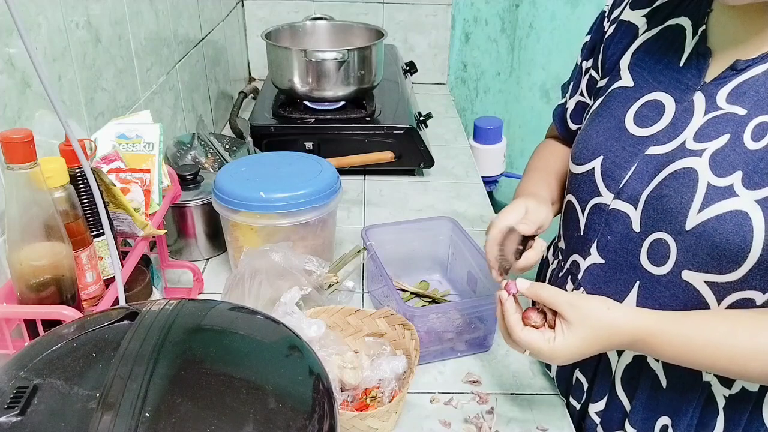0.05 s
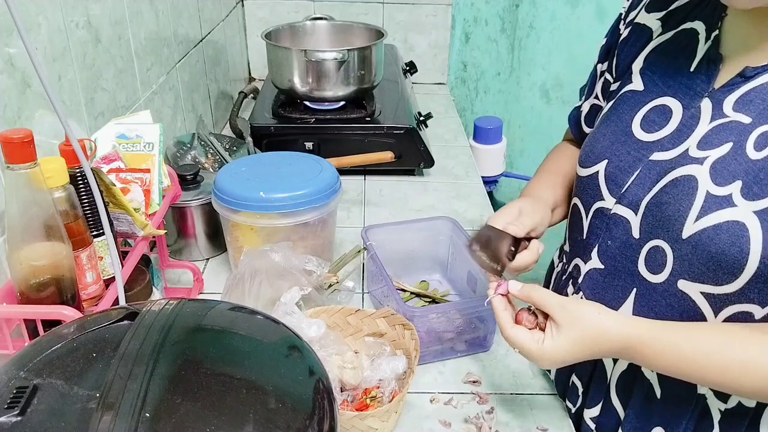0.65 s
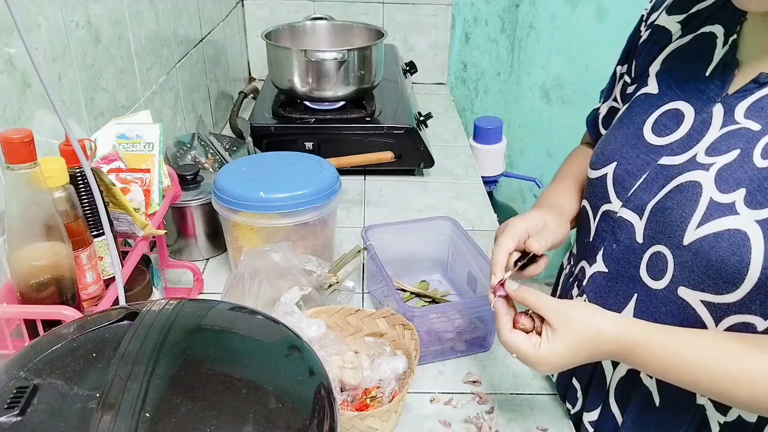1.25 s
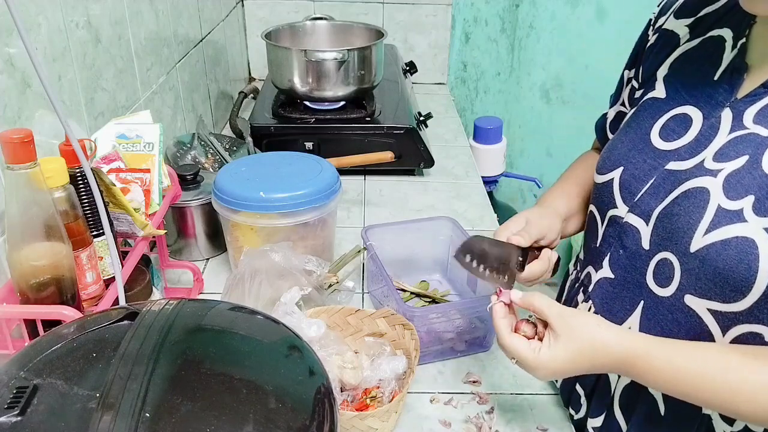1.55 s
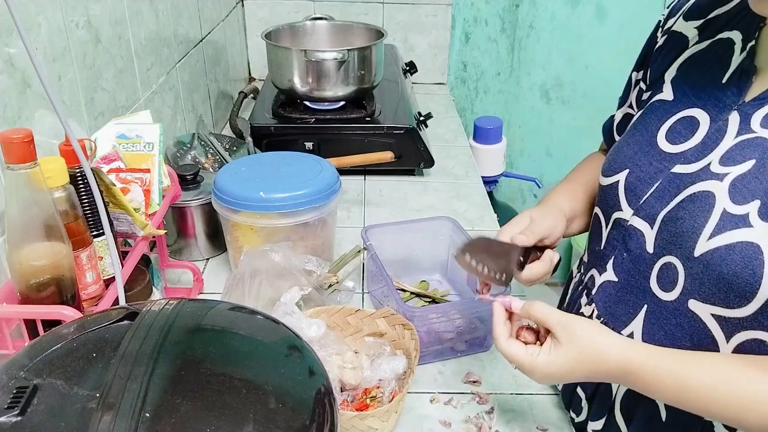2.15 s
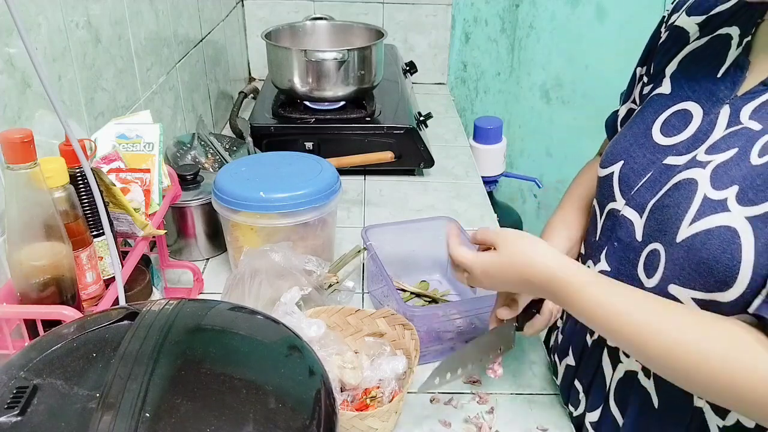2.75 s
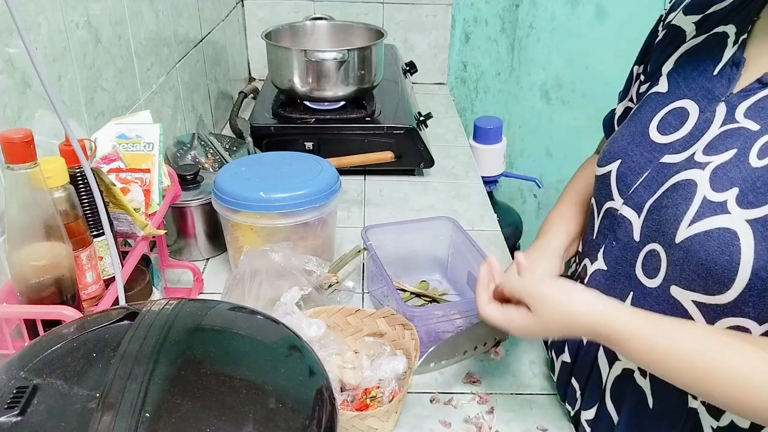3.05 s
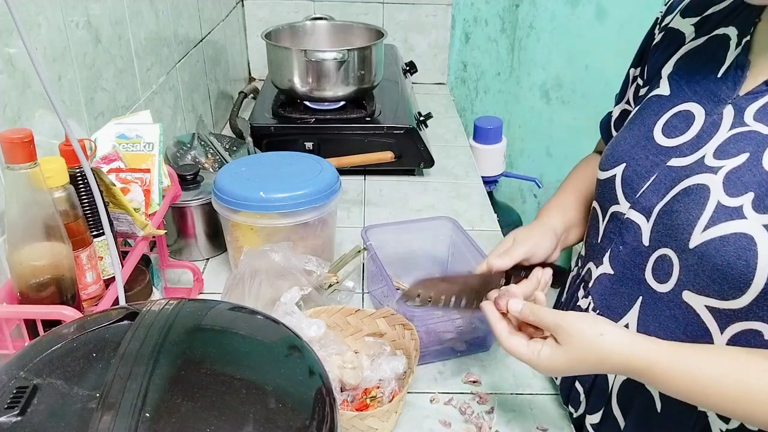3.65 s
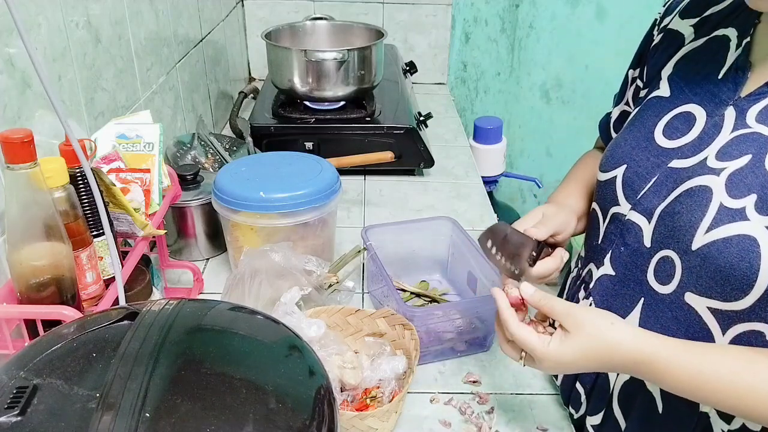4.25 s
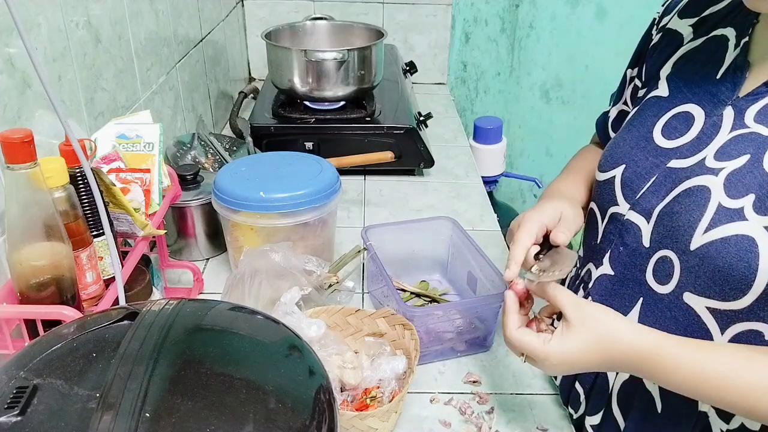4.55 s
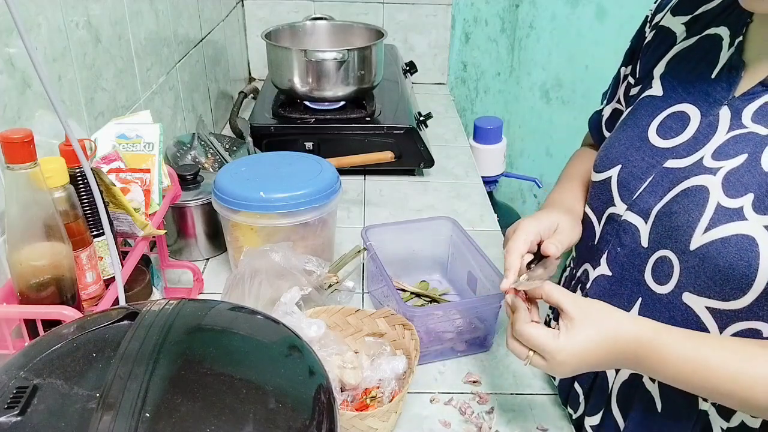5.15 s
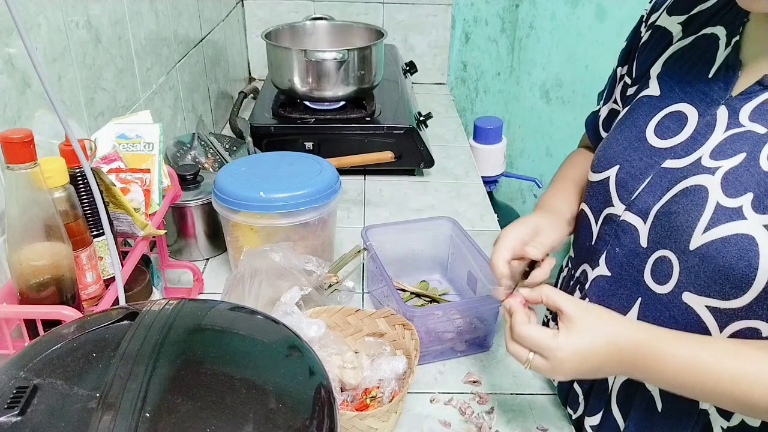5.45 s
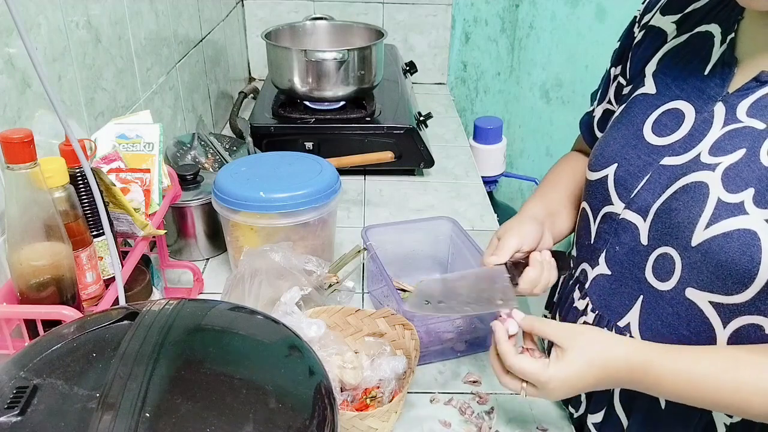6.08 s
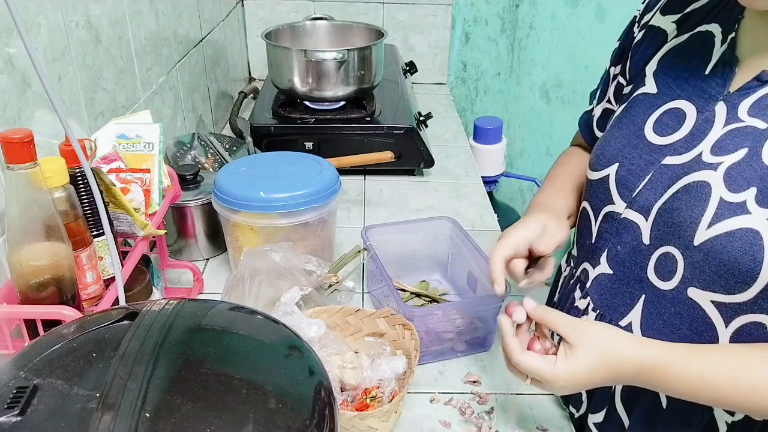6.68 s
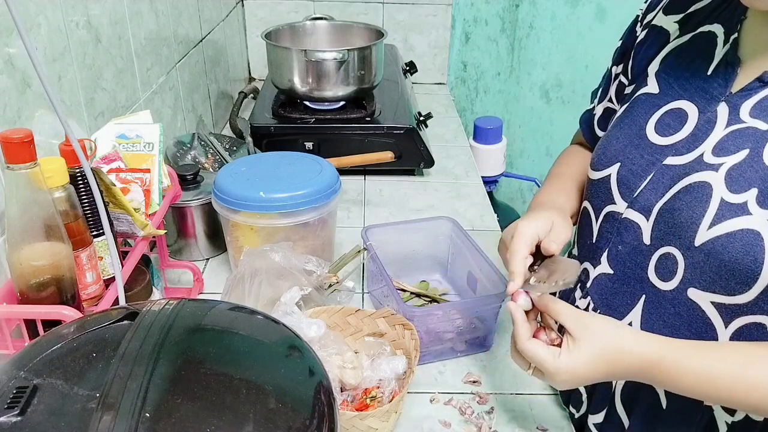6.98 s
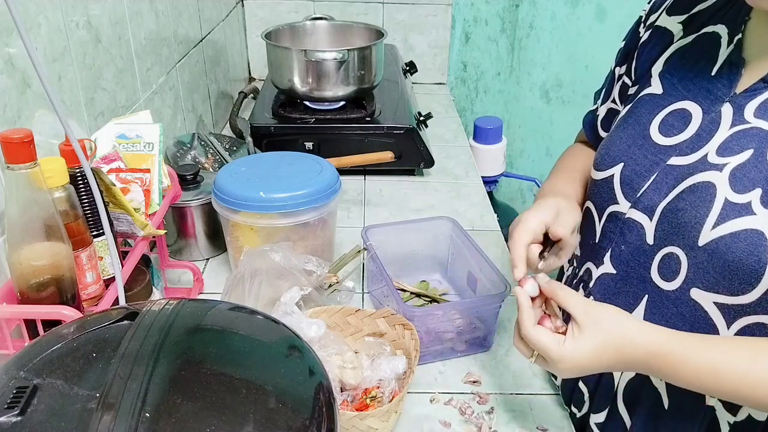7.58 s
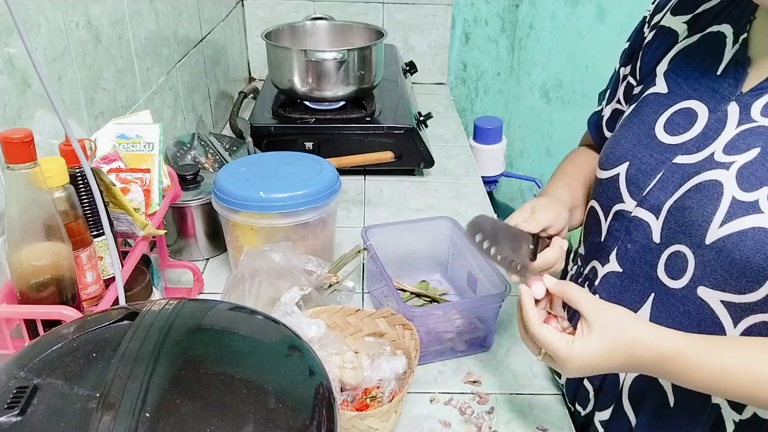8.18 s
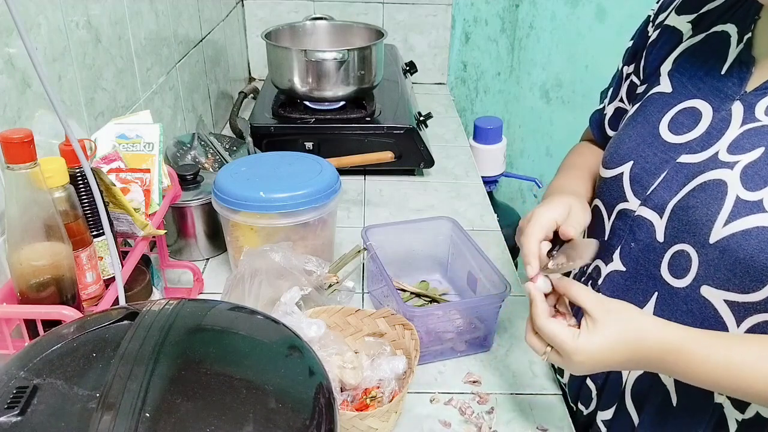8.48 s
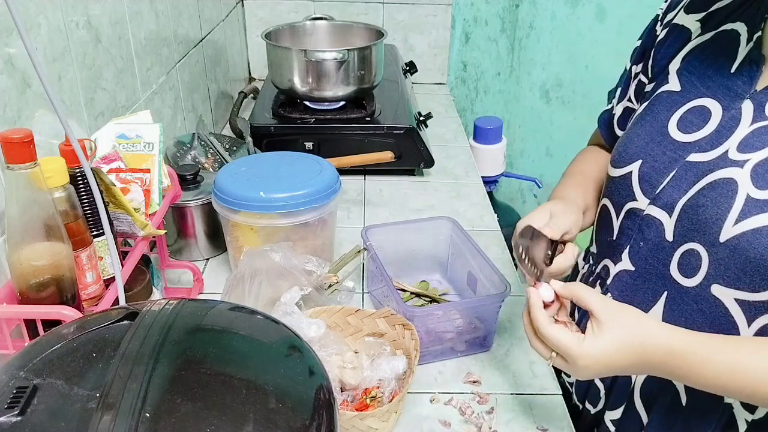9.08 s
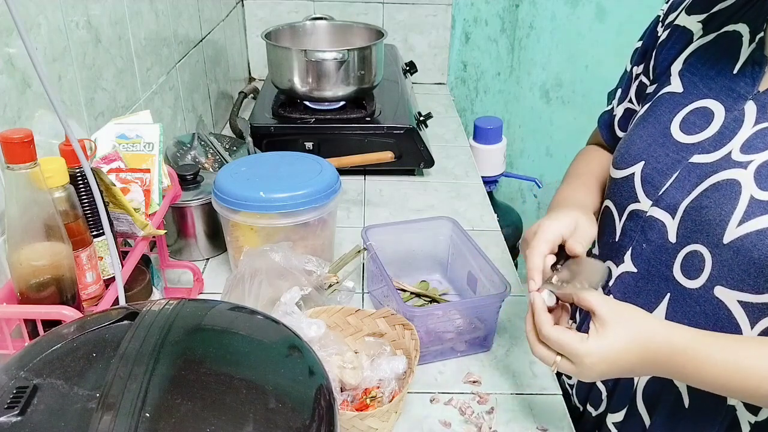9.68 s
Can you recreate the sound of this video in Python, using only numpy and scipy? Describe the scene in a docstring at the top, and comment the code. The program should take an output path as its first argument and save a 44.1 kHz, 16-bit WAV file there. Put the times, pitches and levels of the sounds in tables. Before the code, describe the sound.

A knife peels shallots in soft dry crackles and snaps, with one hollow counter knock over a gas burner's low hum.

```python
"""Peeling shallots

A knife works in a small tiled kitchen, over the low hum of a gas ring under a pot.
Dry skin snaps when nicked and crackles when pulled; blade or thumb squeaks on the moist flesh.
Something knocks on the counter, fingers brush the steel into a faint ring, later the blade ticks."""
import sys
import numpy as np
from scipy import signal
from scipy.fft import rfft, irfft, next_fast_len
from scipy.io import wavfile
from scipy.ndimage import uniform_filter1d

SR = 44100
rng = np.random.default_rng(int(sys.argv[2]) if len(sys.argv) > 2 else 0)


def master_out(mix):
    """Clip the mix to full scale and print it as 16-bit PCM to the path in sys.argv[1]."""
    frames = np.transpose(np.atleast_2d(mix))
    ceiling = np.clip(frames, -1, 1)
    pcm = np.round(ceiling * 32767).astype(np.int16)
    wavfile.write(sys.argv[1], SR, pcm)


N = 437913
TIME_S = np.arange(N) / SR
EVENT_SAMPLES = SR // 2

# skin pulls, bigger pieces reach lower: crest/s, rise/s, fall/s, crisp/dB, body/dB, low edge/Hz
SKIN_PULLS = [(0.345, .023, 0.034, -55.5, -59.5, 2800), (1.165, 0.068, 0.1, -58.5, -66, 3040),
              (1.399, 0.092, 0.1, -57.5, -69.5, 3560), (1.549, 0.046, 0.06, -54, -59.5, 2370),
              (1.743, .04, 0.038, -42, -43.5, 1775), (2.198, .14, 0.2, -55.5, -58.5, 1880),
              (2.518, 0.2, 0.28, -58, -63, 2400), (3.192, 0.1, 0.078, -62, -66, 3570),
              (3.365, 0.088, 0.047, -53, -60, 3500), (3.54, .11, .074, -61, -63, 2730),
              (4.079, 0.11, 0.15, -70, -66.5, 1480), (4.531, .083, .044, -73, -64, 1460),
              (5.265, 0.055, 0.017, -45.5, -53.5, 1960), (5.605, 0.096, 0.09, -55, -64.5, 2130),
              (5.794, .052, 0.035, -48.5, -52, 2210), (6.19, .089, .03, -49.5, -57.5, 1970),
              (7.068, 0.029, 0.013, -53.5, -57, 3220), (7.79, 0.13, 0.13, -64.5, -67.5, 3300),
              (8.621, .07, 0.16, -56.5, -63, 2900), (8.839, .07, 0.15, -50.5, -61, 3170),
              (9.175, .044, 0.013, -42, -51, 2040), (9.915, 0.038, 0.038, -56.5, -63, 3020)]
# resonances of the sheet of skin: f/Hz, width/Hz, level/dB
SHEET_MODES = [(4160, 260, -9.5), (4940, 670, -5), (7040, 120, -11.5), (9070, 220, 0.5)]
# skin snaps: t/s, level/dB, flake f/Hz, length/s
SKIN_SNAPS = [(0.336, -43, 8800, 0.0036), (0.4743, -21, 8740, 0.0042), (1.143, -36, 9000, 0.003),
              (1.194, -33, 8700, 0.0018), (1.763, -21.5, 6760, 0.0038), (1.895, -37.5, 9300, .007),
              (3.141, -41.5, 4900, 0.0069), (3.179, -25.5, 6340, 0.0017), (3.643, -34.5, 6960, 0.0032),
              (5.043, -43.5, 8900, 0.0042), (5.182, -30.5, 8750, .0035), (5.271, -26, 7140, 0.004),
              (5.542, -31.5, 8600, 0.0031), (5.587, -30.5, 6800, 0.0028), (5.602, -28.5, 5460, 0.0054),
              (5.751, -27.5, 3400, 0.0046), (6.068, -40, 8850, .007), (6.106, -40.5, 9300, 0.0036),
              (6.208, -40, 4970, 0.012), (6.641, -41.5, 9100, 0.0034), (6.746, -35, 8760, 0.0079),
              (7.047, -31, 6700, 0.0058), (8.815, -32.5, 9500, 0.0039), (9.149, -29, 9200, 0.012),
              (9.166, -26, 6800, 0.019)]
# stick-slip on the flesh: start/s, end/s, f/Hz, level/dB
FLESH_SQUEAKS = [(0.577, 0.722, 4540, -68), (1.132, 1.205, 4900, -66), (1.546, 1.606, 1180, -61),
                 (1.713, 1.752, 2113, -49), (1.895, 1.9, 2220, -50.5), (2.472, 2.536, 3040, -64),
                 (5.744, 5.75, 3140, -56), (6.743, 6.764, 2330, -56.5), (7.569, 7.62, 3740, -69.5),
                 (7.947, 7.99, 4980, -70.5)]
# knock and bounces: t/s, level/dB, hardness/Hz
KNOCK_CONTACTS = [(2.7385, 0.5, 900), (2.7415, 5, 3620), (2.7515, -25, 2500), (2.759, -5, 1800),
                  (2.777, -8.5, 1500)]
# counter modes: f/Hz, level/dB, t60/s
COUNTER_MODES = [(242.4, -36.5, 0.19), (284, -32, 0.15), (399, -36, 0.14), (418, -31.5, 0.26),
                 (490, -31, .2), (617, -35, 0.27), (704, -30, 0.33), (736, -24, 0.26), (817, -49, 0.2),
                 (862, -20, 0.077), (850, -60, .16), (1080, -51, 0.11), (1168, -48, 0.47),
                 (1420, -42.5, 0.23), (1540, -41, 0.13)]
# pinched blade modes: f/Hz, level/dB, t60/s
TICK_MODES = [(3300, -7, .05), (4760, 3, 0.017), (5100, -9, 0.033), (6670, -13, .025), (8560, -1, .01)]
# finger friction on the blade: t/s, level/dB
BRUSH_LEVELS = [(3.27, -82), (3.30, -77), (3.37, -69), (3.44, -70), (3.52, -59), (3.58, -64), (3.64, -76)]
# brushed blade modes: f/Hz, width/Hz, level/dB
BLADE_MODES = [(2140, 54, -4), (4060, 140, -12), (7140, 110, 5), (8500, 300, -1)]
# flame strength: t/s, level/dB
FLAME_LEVELS = [(0.0, -52), (0.52, -55), (1.16, -54), (1.99, -56), (2.54, -55), (3.18, -60), (3.46, -57.5),
                (5.34, -54), (5.78, -55.5), (8.71, -53), (9.43, -58.5), (9.93, -55)]
# burner roar: f/Hz, density/dB
ROAR_SPECTRUM = [(20, -15), (42, -21), (60, 4.5), (95, -7), (170, -0.5), (290, -4.5), (400, -8.5),
                 (580, -17.5), (1150, -17.5), (1400, -22.5), (2500, -27.5), (5000, -41)]
# room modes driven by the roar: f/Hz, width/Hz, level/dB
ROOM_MODES = [(59, 12, -77.5), (162.6, 11.8, -63), (281.3, 7.8, -71.5), (373.5, 17.5, -72.5)]
# steady hiss: f/Hz, density/dB
HISS_SPECTRUM = [(1500, -30), (3000, -1.5), (5600, 0), (6600, 7), (8200, 5.5), (9400, 7.5), (10200, 2.5),
                 (10800, -21), (12500, -27)]
# tiled kitchen decay: f/Hz, t60/s
KITCHEN_DECAY = [(150, 0.13), (700, 0.32), (2000, 0.34), (4000, 0.23), (7000, 0.35), (10000, 0.26)]


def peeling(crisp_gain_db=-3.0, body_gain_db=-2.5, swell_db=11.0, catch_db=3.5,
            sheet_db=0.5, fold_db=-6.0, fold_width_hz=85):
    """Each pull swells and fades; tiny breaks catch and let go, ringing the sheet and its folds."""
    out, t = np.zeros(N), TIME_S[:EVENT_SAMPLES]
    for crest_s, rise_s, fall_s, crisp_db, body_db, edge_hz in SKIN_PULLS:
        slack = np.interp(t, [0, rise_s, rise_s + fall_s], [1, 0, 1]) ** 1.61
        pull = from_db(-swell_db * slack + catch_db * drift(per_s=85.8, size=EVENT_SAMPLES))
        pull *= np.clip(np.minimum(t, rise_s + fall_s + 0.02 - t) / 0.013, 0, 1)
        taut = np.exp(-((t - rise_s) / 0.4) ** 2)
        breaks = fractures(per_s=4000, spread_db=2.0)
        sheet = taut * from_db(sheet_db) * resonances(breaks, SHEET_MODES)
        crisp = (crisp_db + crisp_gain_db, 5900, 11500)
        body = (body_db + body_gain_db, edge_hz, min(3.4 * edge_hz, 6200))
        for db, low_hz, high_hz in (crisp, body):
            folds_hz = low_hz + (high_hz - low_hz) * (np.arange(6) + rng.random(6)) / 6
            folds = sum(rms_one(resonate(breaks, hz, fold_width_hz)) for hz in folds_hz)
            folds = from_db(fold_db) * waver(folds, depth=0.02, per_s=18)   # bending retunes them
            crackle = rms_one(band(breaks, low_hz, high_hz))
            skin = band(crackle + sheet + folds, low_hz, high_hz, order=3)
            add(out, crest_s - rise_s, from_db(db) * pull * rms_one(skin))
    return out


def snapping(gain_db=-10.5, flake_width_hz=550, flake_loss_per_db=0.4):
    """A brief run of breaks rings the loosened flake; harder snaps are more crack than ring."""
    out, t = np.zeros(N), TIME_S[:EVENT_SAMPLES]
    mean_db = np.mean([row[1] for row in SKIN_SNAPS])
    for start_s, db, hz, length_s in SKIN_SNAPS:
        progress = t / (length_s / 2)
        tear = 2 * np.sqrt(progress) * np.exp(-progress ** 2)
        breaks = tear * fractures(per_s=20000, spread_db=1.5)
        flake_db = -flake_loss_per_db * (db - mean_db)
        flake = from_db(flake_db) * rms_one(resonate(breaks, hz, flake_width_hz))
        edge = np.diff(band(breaks, 2700, 9250, order=3), prepend=0)
        crack = rms_one(edge + 0.49 * band(breaks, 2330, 6300))
        tear_rms = np.sqrt(np.mean(tear ** 2))   # a longer tear frees more energy
        add(out, start_s, from_db(db + gain_db) * tear_rms * rms_one(flake + crack))
    return out


def squeaking(gain_db=1.0, wander=0.0406, half_width=0.058):
    """Uneven stick-slip on the flesh: a narrow rasp of wandering pitch."""
    out, t = np.zeros(N), TIME_S[:EVENT_SAMPLES]
    for start_s, end_s, hz, db in FLESH_SQUEAKS:
        slips = band(rng.standard_normal(EVENT_SAMPLES), hz * (1 - half_width), hz * (1 + half_width))
        grip = np.clip(np.minimum(t, end_s - start_s - t) / 0.0028, 0, 1)
        rasp = rms_one(grip * waver(slips, wander, per_s=78))
        grip_rms = np.sqrt(np.mean(grip ** 2))
        add(out, start_s, from_db(db + gain_db) * grip_rms * rasp)
    return out


def counter_knock(ring_db=2.5, crack_db=-17.0, crack_s=0.0021, thud_db=-20.0, thud_hz=790,
                  thud_t60_s=0.047, hollow_db=-30.0, hollow_hz=400):
    """A blunt object lands and chatters; each contact cracks and thuds, the hardest rings the counter."""
    contacts, t = np.zeros(N), TIME_S[:SR]
    for start_s, db, hardness_hz in KNOCK_CONTACTS:
        burst = rng.standard_normal(SR) * np.exp(-t / crack_s)
        crack = from_db(crack_db) * band(burst, 150, hardness_hz + 400)
        thud = from_db(thud_db) * np.sin(2 * np.pi * thud_hz * t)
        hollow = from_db(hollow_db) * np.sin(2 * np.pi * hollow_hz * t)
        decay = from_db(-60 * t / thud_t60_s)
        add(contacts, start_s, from_db(db) * (crack + (thud + hollow) * decay))
    hardest_s = max(KNOCK_CONTACTS, key=lambda row: row[1])[0]
    counter = from_db(ring_db) * strike(hardest_s, COUNTER_MODES)
    return band(kitchen(contacts, wet_db=-3.5) + counter, 170, 4000, order=3)


def blade_tick(at_s=7.0475, gain_db=-34):
    """The blade slips through; one sharp contact rings the thumb-damped steel."""
    return from_db(gain_db) * band(strike(at_s, TICK_MODES), 3000, 10500)


def blade_brush():
    """Finger friction rings the thin steel."""
    steel = resonances(rng.standard_normal(N), BLADE_MODES)
    times_s, levels_db = np.transpose(BRUSH_LEVELS)
    return rms_one(steel) * np.interp(TIME_S, times_s, from_db(levels_db), left=0, right=0)


def burner(roar_db=-57.0, hiss_db=-69.5, hum_db=-53.5, hum_hz=121.2, hum_waver_db=3.1):
    """Roar, booming room modes and a wavering hum follow the flame; a thin hiss stays steady."""
    times_s, levels_db = np.transpose(FLAME_LEVELS)
    flame = from_db(np.interp(TIME_S, times_s, levels_db - np.median(levels_db)))
    roar = from_db(roar_db) * noise(ROAR_SPECTRUM)
    roar += sum(from_db(db) * boom(hz, width_hz) for hz, width_hz, db in ROOM_MODES)
    hum = boom(hum_hz, width_hz=11)
    hum /= np.sqrt(uniform_filter1d(hum ** 2, size=SR // 5))   # keeps only the quick flutter
    hum *= flame ** 0.85 * from_db(hum_waver_db * drift(per_s=6.4, size=N))
    return flame ** 0.56 * roar + from_db(hum_db) * hum + from_db(hiss_db) * noise(HISS_SPECTRUM)


def boom(hz, width_hz):
    """Noise swaying in one room mode, rms 1."""
    once = resonate(rng.standard_normal(N + SR), hz, 2 * width_hz)
    return rms_one(resonate(once, hz, 2 * width_hz)[SR:])


def kitchen(x, wet_db, onset_s=0.0035):
    """Adds dense echoes off the tiles, dying band by band."""
    t, echoes = TIME_S[:SR // 2], 0
    edges_hz = np.geomspace(100, 14000, 9)
    for low_hz, high_hz in zip(edges_hz, edges_hz[1:]):
        t60_s = at_hz(KITCHEN_DECAY, np.sqrt(low_hz * high_hz))
        echoes += band(rng.standard_normal(len(t)), low_hz, high_hz, order=3) * from_db(-60 * t / t60_s)
    echoes *= np.clip(t / onset_s - 0.5, 0, 1)
    echoes /= np.sqrt(np.sum(echoes ** 2))
    return x + from_db(wet_db) * signal.fftconvolve(x, echoes)[:N]


def fractures(per_s, spread_db):
    """Tiny breaks: random clicks, many small, few large."""
    sizes = from_db(spread_db * np.minimum(rng.exponential(1, EVENT_SAMPLES), 4))
    signs = rng.choice([-1, 1], EVENT_SAMPLES)
    return sizes * signs * (rng.random(EVENT_SAMPLES) < per_s / SR)


def strike(at_s, modes):
    """A unit click rings decaying cosines of alternating sign."""
    out, click = np.zeros(N), np.zeros(N)
    click[round(at_s * SR)] = 1
    for k, (hz, db, t60_s) in enumerate(modes):
        radius = from_db(-60 / (t60_s * SR))
        pole_real = radius * np.cos(2 * np.pi * hz / SR)
        ring = signal.lfilter([1, -pole_real], [1, -2 * pole_real, radius ** 2], click + 1e-18)
        out += (-1) ** k * from_db(db) * ring
    return out


def resonances(x, modes):
    """Parallel modes driven by x, each scaled to its rms level."""
    return sum(from_db(db) * rms_one(resonate(x, hz, width_hz)) for hz, width_hz, db in modes)


def resonate(x, hz, width_hz):
    """Two-pole resonance, peak gain 1."""
    radius = np.exp(-np.pi * width_hz / SR)
    feedforward = np.array([1, 0, -1]) * (1 - radius ** 2) / 2
    feedback = [1, -2 * radius * np.cos(2 * np.pi * hz / SR), radius ** 2]
    return signal.lfilter(feedforward, feedback, x + 1e-18)


def noise(spectrum):
    """Steady coloured noise, rms 1."""
    size = next_fast_len(N)
    gains = from_db(at_hz(spectrum, np.arange(size // 2 + 1) * SR / size))
    return rms_one(irfft(rfft(rng.standard_normal(size)) * gains, size)[:N])


def waver(x, depth, per_s):
    """Random pitch wander."""
    speed = 1 + depth * drift(per_s, size=len(x))
    return np.interp(np.cumsum(speed), np.arange(len(x)), x)


def drift(per_s, size):
    """Linearly joined random values, spread about 1."""
    return np.interp(np.arange(size) * per_s / SR, np.arange(4096), rng.standard_normal(4096))


def at_hz(table, hz):
    """Table lookup on a log-frequency axis."""
    knots_hz, values = np.transpose(table)
    return np.interp(np.log(np.maximum(hz, 1)), np.log(knots_hz), values)


def band(x, low_hz, high_hz, order=2):
    edges_hz = [low_hz, max(high_hz, low_hz + 100)]
    return signal.sosfilt(signal.butter(order, edges_hz, "band", fs=SR, output="sos"), x)


def add(out, start_s, sound):
    start = max(round(start_s * SR), 0)
    out[start:start + len(sound)] += sound[:N - start]


def from_db(db):
    return 10 ** (np.asarray(db) / 20)


def rms_one(x):
    return x / np.sqrt(np.mean(x ** 2) + 1e-20)


def scene():
    """Knife work and a knock in the ringing kitchen, over the burner."""
    hands = peeling() + snapping() + blade_tick() + squeaking() + blade_brush()
    return (kitchen(hands, wet_db=-2.0, onset_s=0.0014) + counter_knock() + burner())[None]


def record(dry, cutoff_hz=10650, low_rate_hz=24000, image_db=-29.5, image_top_hz=15500):
    """A low sampling rate cuts the top steeply and mirrors the treble faintly above the cut."""
    cut = signal.sosfilt(signal.ellip(10, 0.2, 70, cutoff_hz, fs=SR, output="sos"), dry)
    analytic = signal.hilbert(cut, next_fast_len(N))[:, :N]
    image = from_db(image_db) * np.real(analytic * np.exp(-2j * np.pi * low_rate_hz * TIME_S))
    return signal.sosfilt(signal.ellip(8, 0.2, 80, image_top_hz, fs=SR, output="sos"), cut + image)


dry = scene()
out = record(dry)
master_out(out)
```